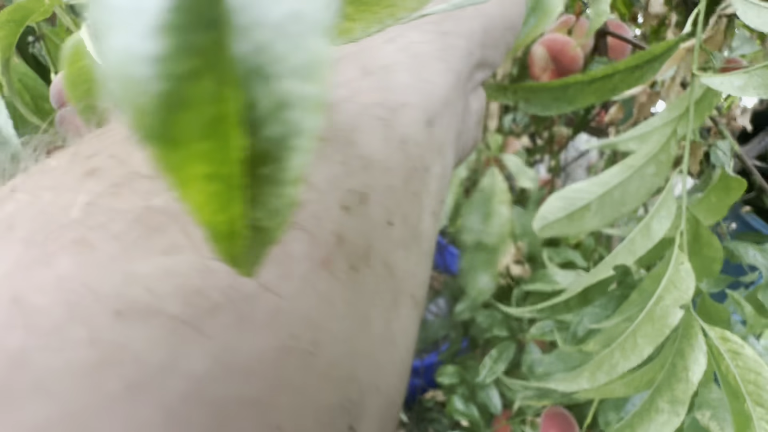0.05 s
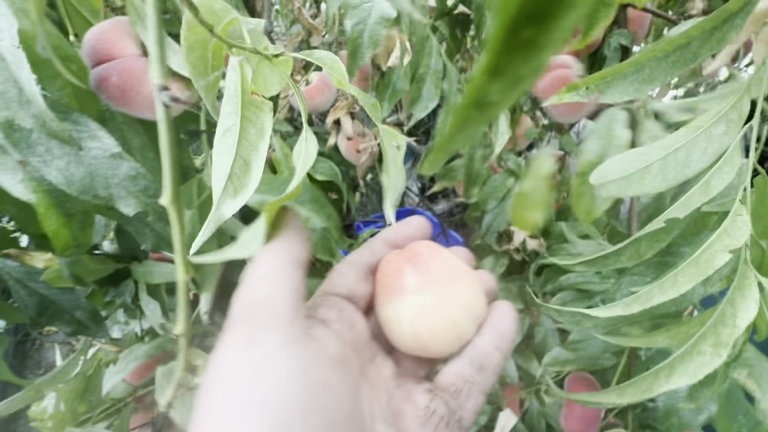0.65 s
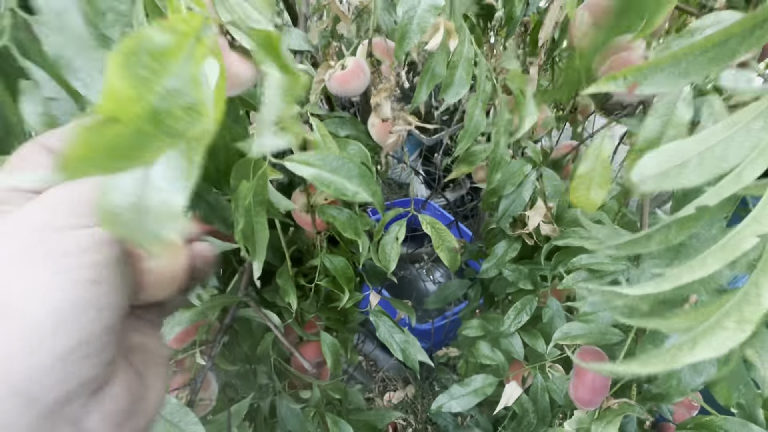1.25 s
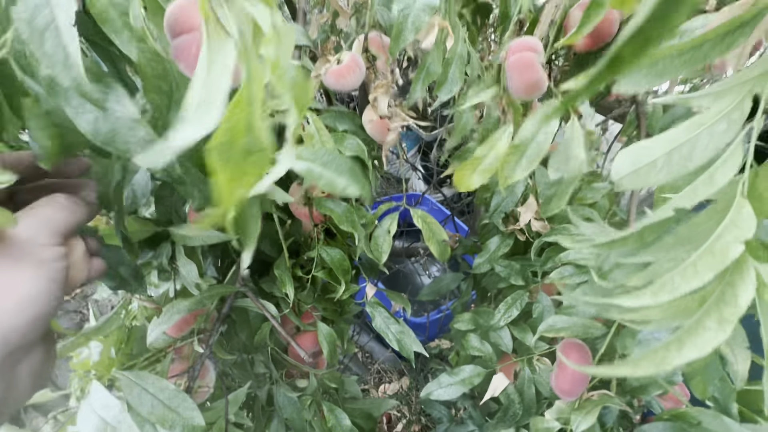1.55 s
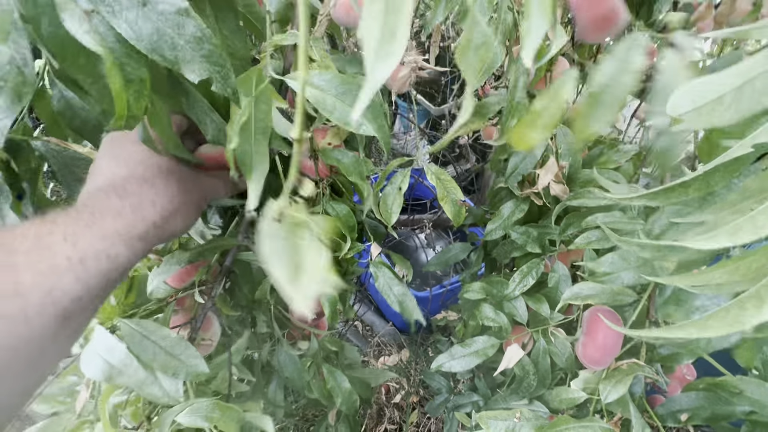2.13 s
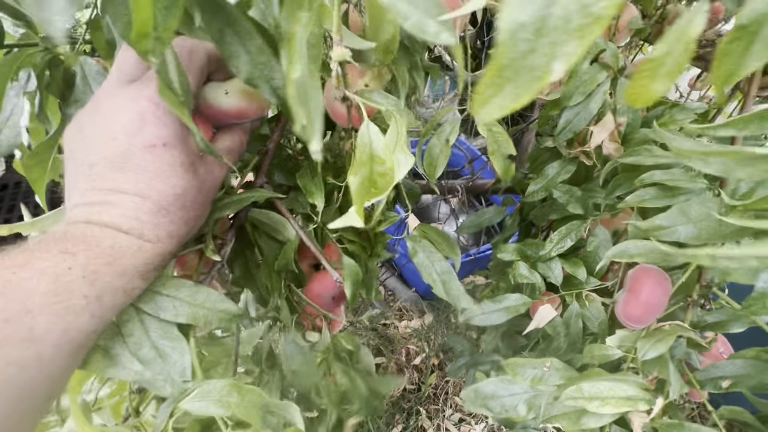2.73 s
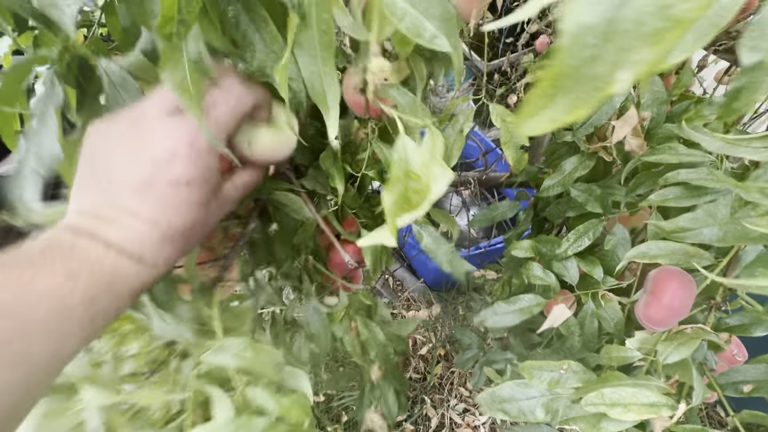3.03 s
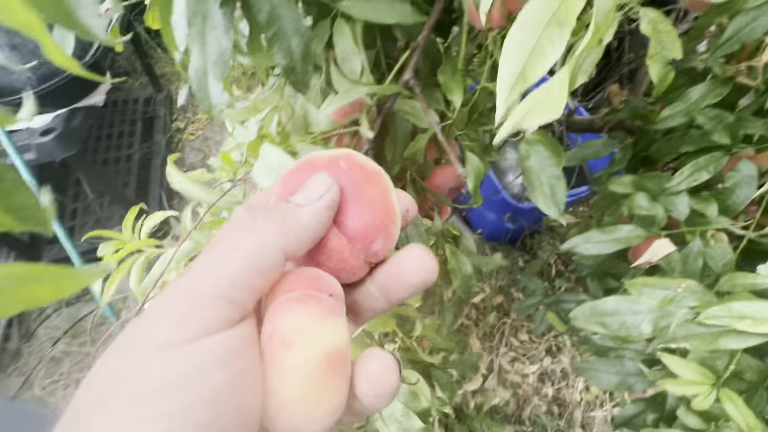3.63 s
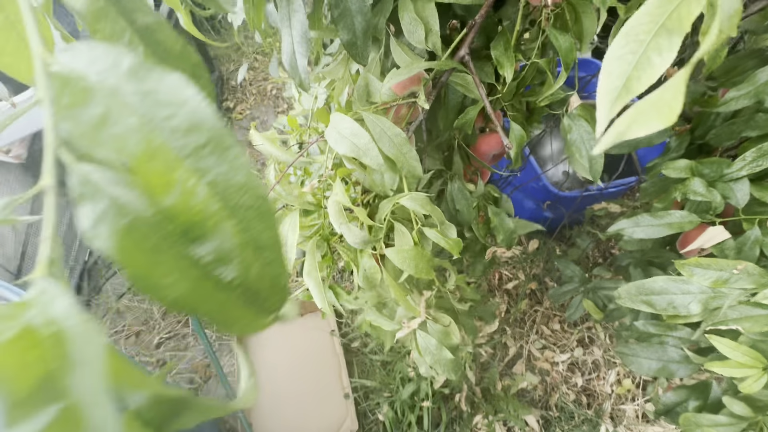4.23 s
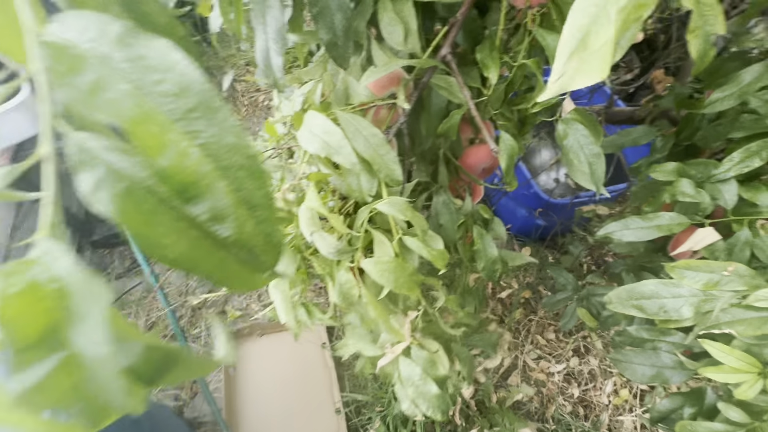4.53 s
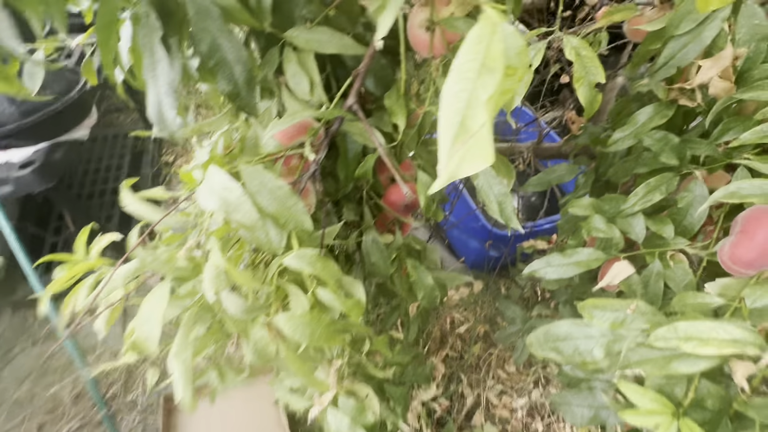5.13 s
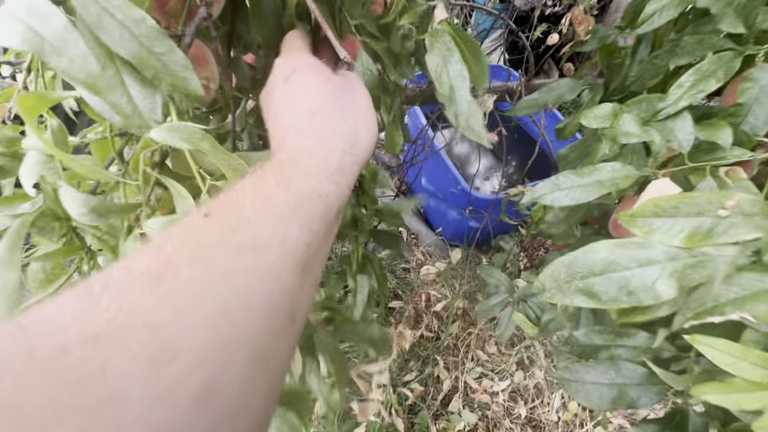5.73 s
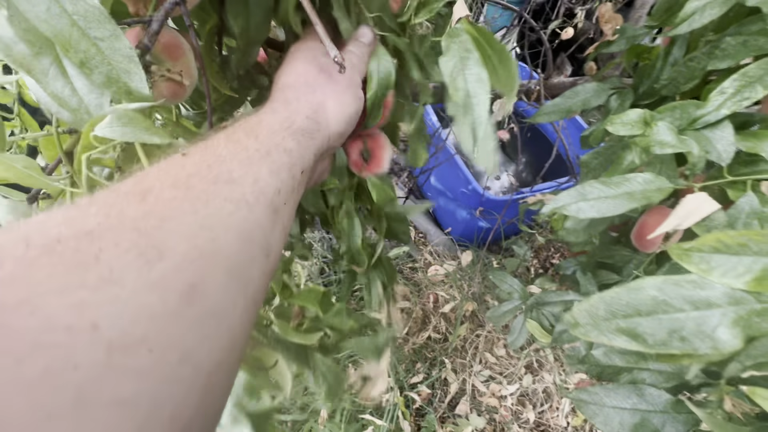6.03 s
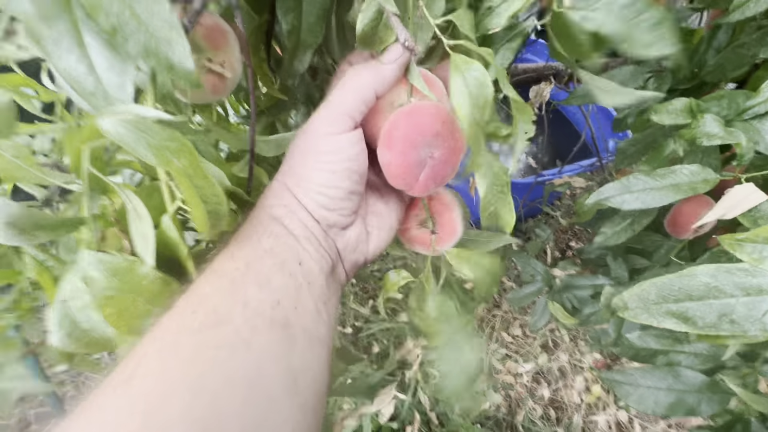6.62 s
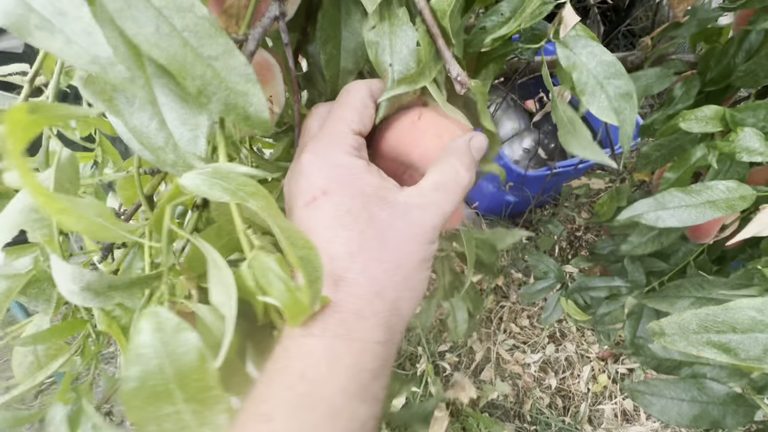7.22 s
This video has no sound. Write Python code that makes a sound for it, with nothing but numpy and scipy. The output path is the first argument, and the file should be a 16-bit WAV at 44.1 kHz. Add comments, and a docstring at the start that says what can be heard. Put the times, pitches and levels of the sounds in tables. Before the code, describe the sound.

A steady, low rush of greenhouse air runs throughout, with everything else heard close up. Right at the start a stem cracks and leaves flick sharply as an arm moves through a peach tree. Until about 3.5 seconds, leaves slide, crackle and tick in uneven strokes over a dull rubbing of arm against branches. Near 2.9 seconds a stem snaps sharply and the branch springs back with a burst of leaves. The rustling thins, and around 4 seconds a dragging leaf gives a faint, falling squeak. From 4.7 seconds two peaches drop into a cardboard box slightly to the left, making a few soft, hollow thuds, then smaller bumps as they roll to rest by 5.3 seconds. The hand goes back in, and crisp rustling with small leaf and twig flicks continues until a last stem snaps at about 7.3 seconds.

```python
"""Picking peaches in a greenhouse, heard close up over steady air. First an arm rubs through the tree:
leaves slide, crackle and flick against it, and a stem cracks. Near 3 s a stem snaps and the branch
springs back, then a dragging leaf squeaks faintly. From 4.7 s two peaches thud into a cardboard box,
making its panels ring, and roll to rest. The hand goes in for more, and a last stem snaps."""
import sys
import numpy as np
from scipy import signal
from scipy.fft import rfft, irfft
from scipy.io import wavfile
from scipy.ndimage import uniform_filter1d

SR = 44100
rng = np.random.default_rng(int(sys.argv[2]) if len(sys.argv) > 2 else 0)


def output_pcm(signal):
    """Save a mono or channel-first signal as 16-bit PCM at the path in sys.argv[1].

    Samples are clipped to [-1, 1] before scaling.
    """
    pcm = np.clip(np.atleast_2d(signal).T, -1, 1) * 32767
    wavfile.write(sys.argv[1], SR, np.round(pcm).astype(np.int16))


N = 329427


def amp(db):
    """Turns decibels into a gain."""
    return 10 ** (np.asarray(db) / 20)


def read(points, hz):
    """Looks up hz in rows of (Hz, value), on a logarithmic frequency axis."""
    f, value = np.transpose(points)
    return np.interp(np.log(hz + 1), np.log(f + 1), value)


def evened(x):
    """Scales a signal to an average power of 1."""
    return x / np.sqrt(np.mean(x ** 2) + 1e-20)


def add(mix, s, sound):
    """Lays a stereo sound into the mix at s seconds."""
    part = mix[:, round(s * SR):][:, :sound.shape[1]]
    part += sound[:, :part.shape[1]]


def noise(colour, size):
    """Stereo noise with the spectrum colour(Hz) in dB; the bass is alike on both sides."""
    # Each row: frequency in Hz, how alike left and right are from 0 to 1.
    likeness = [(60, 0.95), (130, 0.82), (290, 0.71), (640, 0.28), (1400, 0)]
    hz = np.fft.rfftfreq(size, 1 / SR)
    left, other = rfft(rng.standard_normal((2, size)))
    same = read(likeness, hz)
    right = same * left + np.sqrt(1 - same ** 2) * other
    return irfft(np.array([left, right]) * amp(colour(hz)), size)


def patches(shape, size):
    """Random values, smoothed over size steps along each axis."""
    field = rng.standard_normal(shape)
    for axis, width in enumerate(size):
        field = uniform_filter1d(uniform_filter1d(field, width, axis), width, axis)
    return evened(field)


def air():
    """The steady, low rush of air in the greenhouse."""
    # Each row: frequency in Hz, level in dB.
    colour = [(20, -50), (35, -37.5), (58, -26.5), (110, -29.5), (180, -39.5), (350, -40.5), (550, -48),
              (850, -43.5), (1300, -67.5), (2400, -55.5), (4000, -72), (8500, -73), (11000, -69),
              (15500, -93)]
    return noise(lambda hz: read(colour, hz), N)


def rubbing(fade_s=0.24, uneven_db=2):
    """Arm and branches rub dully and unevenly; the sound dies away when the arm rests."""
    # Each row: time in seconds, level in dB.
    movement = [(0, -52.5), (.55, -49), (.75, -54), (1.1, -55), (1.42, -52), (1.6, -52.5), (1.95, -54),
                (2.25, -57), (3.1, -55), (3.5, -64.5)]
    # Each row: frequency in Hz, level in dB.
    colour = [(40, 18), (90, 23), (130, 25.5), (200, 13.5), (290, 24), (400, 17.5), (550, 1), (1000, -9),
              (3000, -38)]
    t = np.arange(N) / SR
    s, level = np.transpose(movement)
    level_db = np.interp(t, s, level) + uneven_db * patches((N,), size=(1500,))
    fade = np.exp(-np.maximum(t - s[-1], 0) / fade_s)
    return noise(lambda hz: read(colour, hz), N) * amp(level_db) * fade


def scatter(clicks, t60, ring_hz, ring_db):
    """Each click rings a leaf and scatters as a short spray, fading by 60 dB in t60 seconds."""
    t = np.arange(SR // 10) / SR
    ring = noise(lambda hz: ring_db * np.exp(-(2 * np.log2((hz + 1) / ring_hz)) ** 2), len(t))
    spray = evened(ring * amp(-60 * t / t60))
    return signal.oaconvolve(clicks[None], spray, axes=1)[:, :N]


def crinkle(per_s, t60, ring_db, spread_db=2, sizes=8):
    """Leaves of several sizes tick at random, mostly softly, now and then louder."""
    out = np.zeros((2, N))
    for ring_hz in np.geomspace(2400, 14000, sizes):
        clicks = np.zeros(N)
        at = rng.integers(0, N, int(per_s * N / SR / sizes))
        clicks[at] = amp(spread_db * np.minimum(rng.exponential(1, len(at)), 3))
        out += scatter(clicks, t60, ring_hz, ring_db)
    return evened(out)


def stroking(t, rise_s=0.032, release_s=0.054, settle_s=.16, settle_db=-8, stir_db=-75):
    """Each arm stroke swells as it meets more leaves, holds and lets go; then the leaves settle."""
    # Each row: start and length in seconds, level in dB, then dry crispness and
    # flutter of whole leaves, both in dB relative to that level.
    strokes = [(0.04, 0.095, -57, 2, -3.5), (0.213, 0.056, -51, 4, -11), (0.376, .07, -68.5, -13, -2.5),
               (0.645, 0.021, -66, -4, -17), (0.85, .04, -67, -28, -3), (0.937, 0.062, -62.5, -6.5, 2.5),
               (1.168, 0.033, -53, -7, -6), (1.356, 0.076, -53, -8, -8), (1.49, 0.11, -61, -6, -3),
               (1.688, 0.12, -66, -1, -23), (1.816, .14, -58.5, -8.5, -18.5), (2.107, 0.11, -58.5, -9, -13),
               (2.316, 0.24, -54.5, -6, -9.5), (2.617, .28, -58.5, -12, -2.5), (2.964, 0.061, -48, -5, -9),
               (3.124, 0.14, -54, -5.5, -9), (3.355, 0.33, -65, -4, -12), (3.871, .22, -59.5, -12.5, -2.5),
               (4.17, 0.053, -66, -10, -1.5), (4.612, .025, -64, -3, -2.5), (4.706, 0.021, -55, -11, -5),
               (5.046, 0.085, -63.5, -11, 1.5), (5.25, .06, -67, -10, -3), (5.392, 0.13, -53.5, -3, -9),
               (5.62, .25, -57, -3.5, -10), (5.912, .16, -55, 0, -12), (6.197, 0.15, -55.5, -1.5, -11),
               (6.435, .11, -56, 0.5, -18.5), (6.621, 0.41, -60, -2.5, -10), (6.764, 0.026, -54.5, 1, -15),
               (7.066, 0.12, -57, -2.5, -13.5), (7.25, 0.029, -63, 1, -9), (7.373, 0.067, -52.5, 0.5, -11)]
    start, length, db, crisp_db, flutter_db = np.transpose(strokes)[:, :, None]
    before, after = np.maximum(start - t, 0), np.maximum(t - start - length, 0)
    fade = np.exp(-after / release_s) + amp(settle_db) * np.exp(-after / settle_s)
    stroke = amp(db) * np.exp(-before / rise_s) * fade / (1 + amp(settle_db))

    def total_db(part_db, stir_part_db):
        """Adds the power of all strokes to that of leaves stirring by themselves."""
        power = ((stroke * amp(part_db)) ** 2).sum(0) + amp(stir_db + stir_part_db) ** 2
        return 10 * np.log10(power)
    level = total_db(0, 0)
    return level, total_db(crisp_db, -14) - level, total_db(flutter_db, 1) - level


def leaves(slip_db=-4, tick_db=-9, slide_db=-2.5, left_db=.5):
    """Leaf edges catch and slip in tiny clicks over the hiss of leaves sliding."""
    # Each row: frequency in Hz, level in dB.
    colour = [(200, 15), (500, 16.5), (850, 16.5), (1200, 18.5), (2200, 13.5), (3000, 8.5), (3800, 8.5),
              (5600, 9.5), (8500, 6.5), (12000, 10), (15500, 5.5)]
    # Each row: frequency in Hz, share of the crispness that applies there.
    crisp_share = [(6000, 0.046), (12000, 0.88)]
    # Each row: frequency in Hz, share of the flutter that applies there.
    flutter_share = [(1300, 0.97), (3500, 0.036)]
    slips = amp(slip_db) * crinkle(per_s=480, t60=0.029, ring_db=4)
    ticks = amp(tick_db) * crinkle(per_s=45, t60=.05, ring_db=6)
    hiss = amp(slide_db) * rng.standard_normal((2, N))
    hz, t, spectra = signal.stft(slips + ticks + hiss, SR, nperseg=256, noverlap=192)
    level, crisp, flutter = stroking(t)
    hz = hz[:, None]
    gain_db = level + read(colour, hz) + crisp * read(crisp_share, hz) + flutter * read(flutter_share, hz)
    gain_db += 2 * patches(gain_db.shape, size=(2, 30))  # each leaf touched has its own tone
    rustle = signal.istft(spectra * amp(gain_db), SR, nperseg=256, noverlap=192)[1][:, :N]
    return rustle * amp([[left_db], [-left_db]])


def cracks(rows, ring_octaves, crack_db, tail_db, low_hz, tail_t60=0.17):
    """Each flick or break is a sharp crack, a ringing spray and a faint echo of the room."""
    out, t = np.zeros((2, N)), np.arange(SR // 3) / SR
    crack = np.exp(-t / .0015)
    for s, db, ring_hz, ring_db, t60, tilt_db in rows:
        def colour(hz):
            """A slope, one broad ring, and little bass."""
            octaves = np.log2((hz + 1) / ring_hz)
            slope_db = tilt_db * np.log2(1 + hz / low_hz) - 20 * np.log10(1 + (low_hz / (hz + 1)) ** 2)
            return slope_db + ring_db * np.exp(-(octaves / ring_octaves) ** 2)
        decay = amp(crack_db) * crack + amp(-60 * t / t60) + amp(tail_db - 60 * t / tail_t60)
        add(out, s, amp(db) * evened(noise(colour, len(t))) * decay)
    return out


def leaf_flicks(mid_t60=0.077, mid_hz=4000):
    """Leaves and twigs flick; a small, high leaf dies away sooner than a large one."""
    # Each row: start in seconds, level in dB, ring pitch in Hz, ring boost in dB, tilt in dB per octave.
    flicks = [(0.034, -41, 11000, 21, -5), (0.086, -34.5, 5000, 1, 5), (0.101, -42, 4760, 12, -1),
              (0.500, -49.5, 4230, 8, -1), (0.534, -52.5, 4100, 17, 3), (0.603, -49, 970, 7, -10),
              (0.793, -56, 1200, 19, -1.5), (0.883, -45, 1530, 7, -13), (0.954, -48.5, 3460, 16, -8.5),
              (1.394, -42, 3700, 14, -1), (2.365, -43, 2740, 12.5, -1), (2.559, -46, 5400, 9, -4),
              (3.018, -39.5, 5660, 23, 3), (3.029, -43.5, 5700, 19, -6), (4.38, -63, 11000, 7, 5),
              (5.279, -55, 8000, 5, 0), (5.538, -41, 8000, 7, 7), (5.927, -41, 8500, 11, 1.5),
              (6.336, -41.5, 11000, 8, 2), (6.368, -42, 2120, 14, -1.5), (6.445, -42.5, 10600, 7, 0),
              (6.508, -47, 11200, 10, 5), (6.557, -42.5, 4300, 14, 0), (6.598, -44.5, 12000, 8, 0.5),
              (7.251, -48, 11000, 13, 2)]
    rows = [(s, db, hz, ring_db, mid_t60 * (hz / mid_hz) ** -0.11, tilt_db)
            for s, db, hz, ring_db, tilt_db in flicks]
    return cracks(rows, ring_octaves=0.21, crack_db=-6.5, tail_db=-32, low_hz=300)


def stem_snaps():
    """Stems break, one bundle of fibres at a time."""
    # Each row: start in seconds, level in dB, ring pitch in Hz, ring boost in dB,
    # fade time in seconds, tilt in dB per octave.
    snaps = [(.0403, -31.5, 1390, 15.5, 0.053, 1), (2.9355, -26, 14100, 12, 0.041, -3),
             (2.939, -32, 2270, 8.5, 0.12, -3.5), (2.947, -37.5, 850, 12, 0.18, -0.5),
             (7.347, -34, 2900, 11.5, 0.085, 0.5)]
    return cracks(snaps, ring_octaves=0.18, crack_db=-9, tail_db=-41, low_hz=280)


def leaf_squeak(width_hz=420):
    """A taut leaf sings faintly as it drags, gripping unevenly, and falls in pitch as it slows."""
    # Each row: time in seconds, pitch in Hz, level in dB.
    glide = [(3.97, 6900, -85), (4.039, 6100, -64), (4.11, 4950, -64), (4.17, 4100, -65), (4.24, 3540, -73)]
    s, pitch, level = np.transpose(glide)
    t, out = np.arange(s[0], s[-1], 1 / SR), np.zeros((2, N))
    smooth = signal.butter(2, width_hz / 2, fs=SR, output="sos")
    fuzz = signal.sosfilt(smooth, rng.standard_normal((2, len(t))) + 1j * rng.standard_normal((2, len(t))))
    phase = 2 * np.pi * np.cumsum(np.interp(t, s, pitch)) / SR
    tone = (fuzz * np.exp(1j * phase)).real
    grip_db = 3.5 * patches(t.shape, size=(500,))
    add(out, s[0], evened(tone * amp(grip_db)) * amp(np.interp(t, s, level)))
    return out


def peach_blows(first_tick_db=-38, second_tick_db=-47.5, tick_growth=.4):
    """Each thud is two contacts, usually a light one then a heavier one; the last is two faint bumps."""
    # Each row: first contact in seconds, wait for the second in seconds, level of the second in dB,
    # the first in dB relative to it, hardness in dB per octave, scuff in dB.
    thuds = [(4.7486, 0.0083, -9.5, -7.5, -4.5, -18.5), (4.8448, 0.0088, -7.5, -13, 0, -9),
             (4.958, 0.016, -10.5, -8, -0.5, -13.5), (5.029, .001, -20.5, -15, -1.5, -10),
             (5.065, .007, -19.5, -14, -6, -13.5), (5.097, .011, -24, -11, -16, -20),
             (5.132, .026, -32, -8, -7.5, -11), (5.213, .06, -46.5, 1.5, -4, -9)]
    # The cardboard cracks under the load. One row: start in seconds, level in dB,
    # hardness in dB per octave, scuff in dB, tick in dB.
    crease = (5, -33.5, 6.5, 5, -59)
    for s, delay, db, touch_db, hard_db, scuff_db in thuds:
        first_db = db + touch_db
        first_hard_db = hard_db - 0.4 * touch_db  # the lighter the first contact, the harder it sounds
        first_scuff_db = scuff_db + 8  # it scuffs more than the soft flesh that follows
        yield s, first_db, first_hard_db, first_scuff_db, first_tick_db + tick_growth * first_db
        yield s + delay, db, hard_db, scuff_db, second_tick_db + tick_growth * db
    yield crease


def box(swell_cycles=0.98, scuff_t60=0.12, tick_t60=0.064, room_db=-36, room_t60=0.48, left_db=2):
    """Soft fruit shakes the cardboard panels: high tones speak first, deep ones swell more slowly."""
    # The box's own tones. Each row: pitch in Hz, level in dB, fade time in seconds.
    tones = [(85, -19, 0.17), (112, -5, 0.16), (124.6, 4.5, 0.073), (174, -10.5, 0.043), (223, -6, 0.055),
             (244.4, -3, 0.086), (278, -8.5, 0.13), (345, -12, 0.056), (414, -14, 0.11), (456.6, -21, 0.15),
             (594, -34, 0.093), (664, -25.5, 0.19), (768, -20, 0.049), (839, -25, 0.14),
             (1080, -28.5, 0.069), (1230, -54, 0.079), (1510, -35, 0.17), (1940, -57, 0.1),
             (2470, -55, 0.19)]
    # Each row: frequency in Hz, how far the left side leads in radians.
    left_lead = [(60, .4), (120, 0.61), (250, 1.15), (600, 1.77), (1200, 2.17), (2400, 4.9)]
    # Each row: frequency in Hz, level in dB.
    scuff_colour = [(50, 7), (170, 22.5), (280, 17.5), (400, 11.5), (650, 3), (1000, -1), (1500, -15),
                    (2500, -13), (4000, -23), (9000, -29)]
    out, t = np.zeros((2, N)), np.arange(SR // 2) / SR
    hz, tone_db, t60 = np.transpose(tones)[:, :, None]
    side = np.array([1, -1])[:, None, None]
    swing = -np.sin(2 * np.pi * hz * t + side * read(left_lead, hz) / 2)
    rings = swing * (1 - np.exp(-t * hz / swell_cycles)) * amp(tone_db - 60 * t / t60)
    scuff_rise = 1 - np.exp(-t / 0.0011)
    scuff_shape = scuff_rise * (amp(-60 * t / scuff_t60) + amp(room_db - 60 * t / room_t60))
    for s, db, hard_db, scuff_db, tick_db in peach_blows():
        panels = (rings * amp(hard_db * np.log2(hz / 118))).sum(1)
        scuff = amp(scuff_db) * noise(lambda f: read(scuff_colour, f), len(t)) * scuff_shape
        tick = amp(tick_db - 60 * t / tick_t60) * rng.standard_normal((2, len(t)))  # skin slaps paper
        add(out, s, amp(db) * (panels + scuff) * amp([[left_db], [-left_db]]) + tick)
    return out


def scene():
    """Air, the arm in the tree, and the box a little to the left."""
    return air() + rubbing() + leaves() + leaf_flicks() + stem_snaps() + leaf_squeak() + box()


def record(dry, low_cut_hz=36, high_cut_hz=15800, in_phase_hz=11170, delay_s=1 / 2970):
    """The microphone trims both ends of the range; the right side's treble reaches the left, delayed."""
    # Each row: frequency in Hz, share common to both sides from 0 to 1.
    shared = [(8400, 0), (9600, .55), (11000, 1)]
    dry = signal.sosfilt(signal.butter(2, low_cut_hz, "high", fs=SR, output="sos"), dry)
    hz = np.fft.rfftfreq(N, 1 / SR)
    left, right = rfft(dry)
    blend = np.pi / 2 * read(shared, hz)
    late = np.exp(-2j * np.pi * (hz - in_phase_hz) * delay_s)
    left = np.cos(blend) * left + np.sin(blend) * late * right
    high_cut = np.clip((high_cut_hz - hz) / 300 + .5, 0, 1)
    return irfft(np.array([left, right]) * high_cut, N)


dry = scene()
out = record(dry)
output_pcm(out)
```